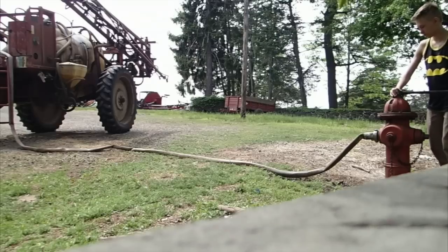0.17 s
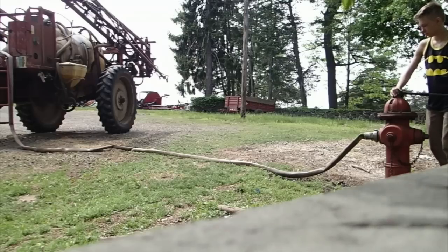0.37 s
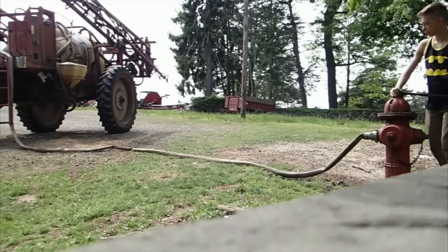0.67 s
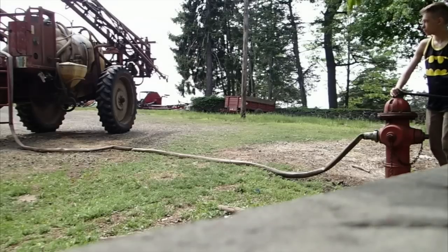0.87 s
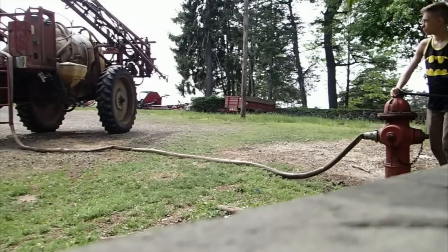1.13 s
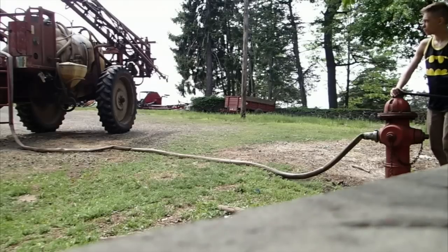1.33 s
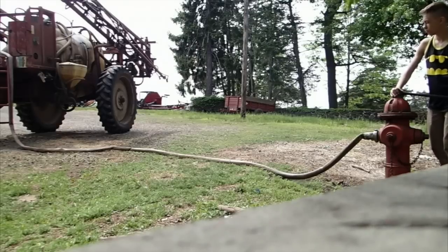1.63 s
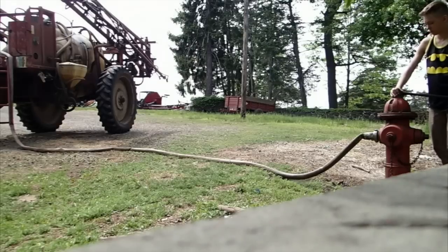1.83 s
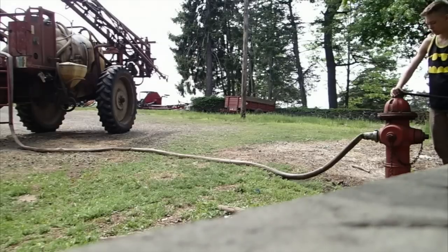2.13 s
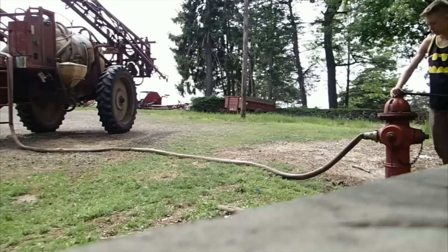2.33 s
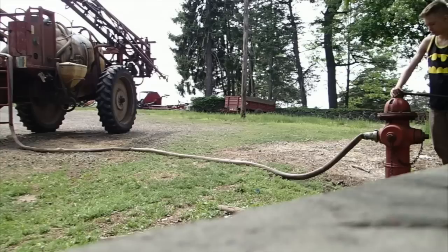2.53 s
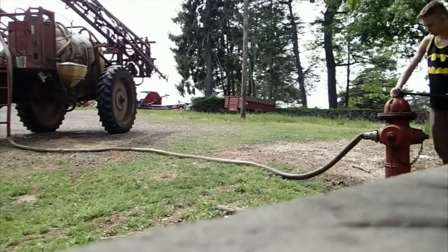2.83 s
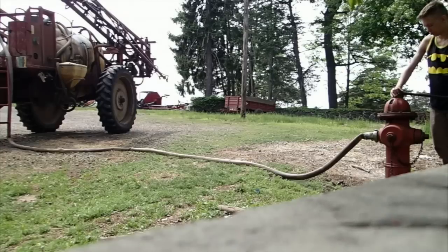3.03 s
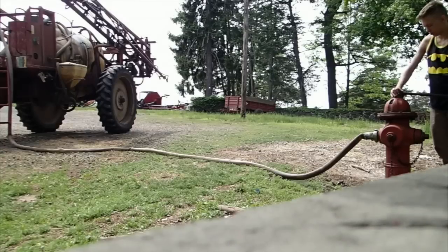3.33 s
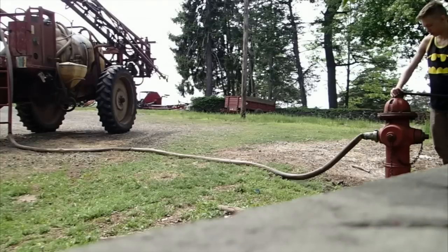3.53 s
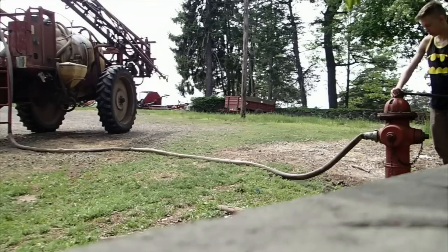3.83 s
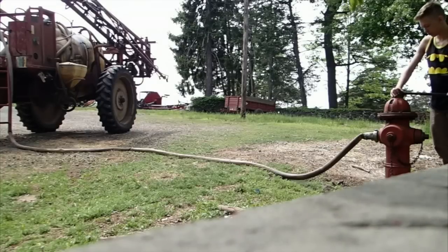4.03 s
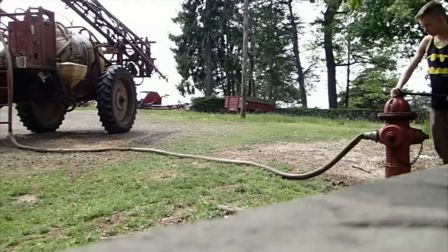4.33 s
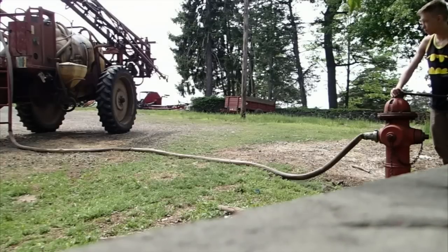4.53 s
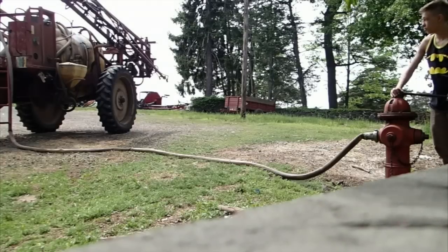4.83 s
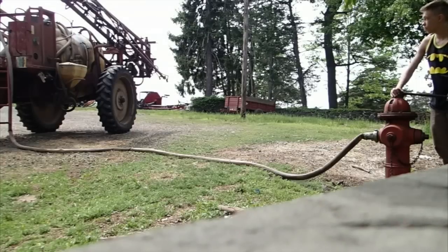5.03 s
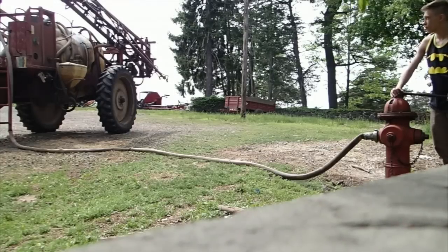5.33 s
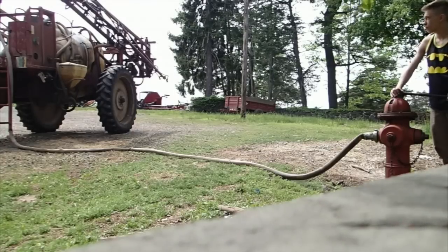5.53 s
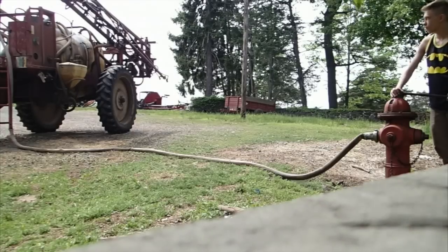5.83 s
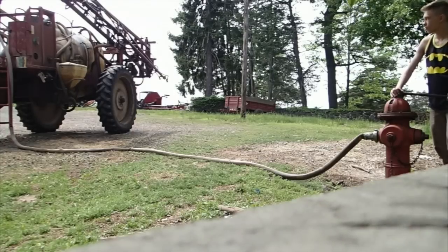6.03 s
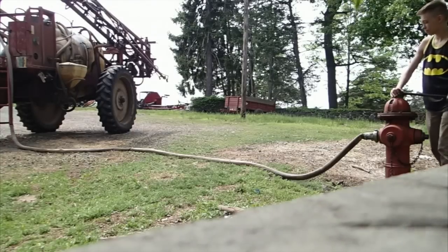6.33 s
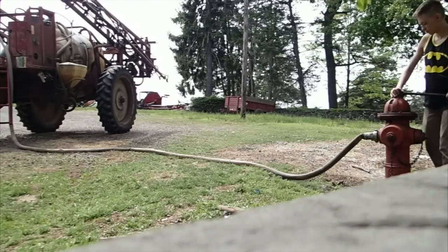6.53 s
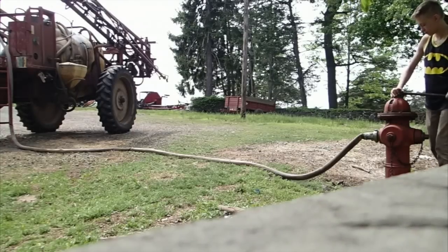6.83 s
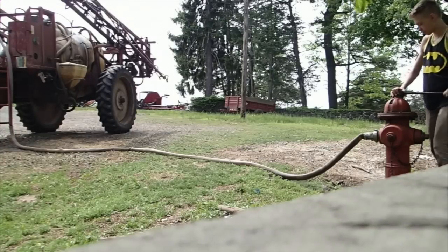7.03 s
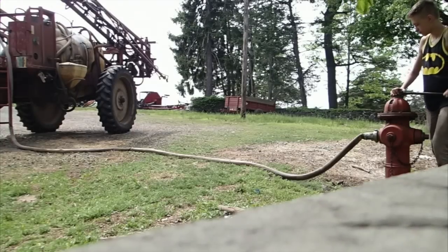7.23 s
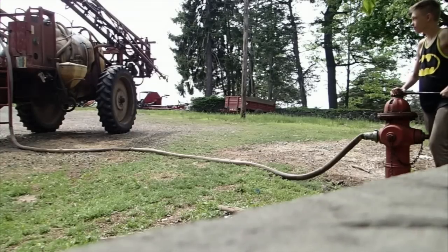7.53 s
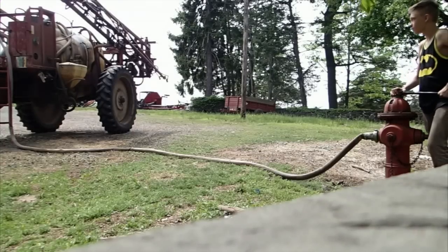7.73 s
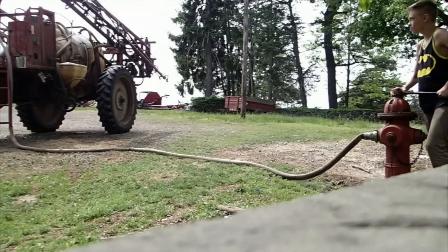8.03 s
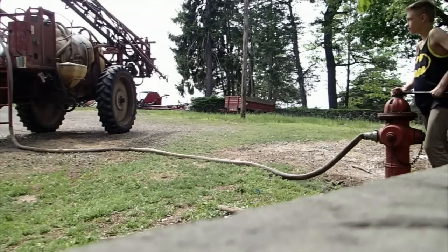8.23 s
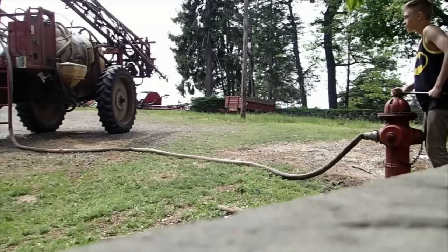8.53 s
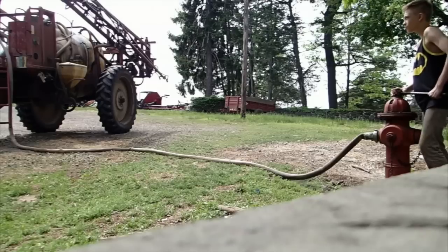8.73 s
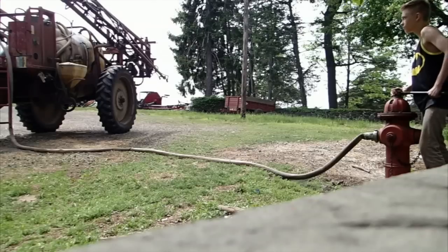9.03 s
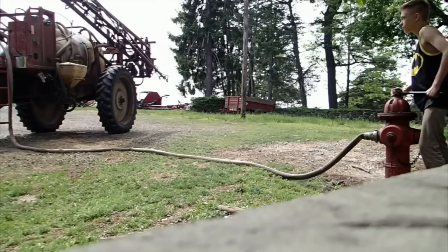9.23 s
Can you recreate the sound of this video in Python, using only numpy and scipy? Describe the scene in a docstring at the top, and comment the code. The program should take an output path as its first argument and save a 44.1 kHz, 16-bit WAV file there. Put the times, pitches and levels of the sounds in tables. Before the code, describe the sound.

A six-cylinder diesel engine on a farm sprayer idles without change for about 9.4 seconds, around 44 firings a second, blending into a rough, chattering purr with hard midrange knocks, metallic panel ringing, small ticks and a soft fan hum. One cylinder's ping repeats about seven times a second, clearest around 6.5 s. Water rushes steadily through a hose, a low whoosh with fine airy hiss that swells slightly near 4.7, 7.7 and 9 s. At 0.1 s a thin high squeak lasts a fifth of a second; at 2.8 s a cluster of tiny, scratchy chirps flickers by. From 0.8 s a faint wavering whistle swells and fades. Light breeze brushes the microphone, with soft low thumps near 0.8, 3.6, 5.5 and 6.6 s and a quick fluttering group at 8.3-8.5 s, when the level dips briefly. Open air, stereo, no reverberation.

```python
"""A six-cylinder diesel sprayer idles in a farmyard while water hisses through a hose into its tank.
From the start, firings ring the engine block, filtered noise makes hiss and breeze, and a thin tone squeaks.
From 0.8 s soft puffs of wind thump now and then, and a wavering tone, the housing's ring, swells and fades.
Near 2.8 s a cluster of tiny gliding tones squeaks again; near 8.4 s the loudest puffs come in a quick group.
The microphone housing also colours engine and water near 4.7 kHz; automatic gain turns loud moments down."""
import sys
import numpy as np
from scipy import signal
from scipy.fft import rfft, irfft
from scipy.io import wavfile
from scipy.ndimage import uniform_filter1d, map_coordinates

SR = 44100
rng = np.random.default_rng(int(sys.argv[2]) if len(sys.argv) > 2 else 0)


def store_pcm(level_fs):
    """Save levels as 16-bit WAV."""
    pcm = np.round(np.clip(level_fs, -1, 1) * 32767).astype(np.int16)
    wavfile.write(sys.argv[1], SR, np.atleast_2d(pcm).T)


N = 414099
TIME = np.arange(N) / SR
FREQ = np.maximum(np.fft.rfftfreq(N, 1 / SR), 1)

# idle speed, counted in firings per second: time_s, firing_rate_hz
IDLE_SPEED = [(0, 44.46), (1.2, 44.42), (2.2, 44.22), (3.2, 44.2), (4.6, 44.43), (5.6, 44.34),
              (9.39, 44.29)]
# cylinders in firing order, relative strengths: knock_db, clatter_db
CYLINDER_STRENGTHS = [(-7, .3), (-12, -.3), (-8, 0), (-9, -.6), (-11, .3), (-9, .6)]
# relative spectrum of the combustion knock: pitch_hz, level_db
KNOCK_SPECTRUM = [(30, -55), (100, -27), (500, -14.5), (1100, 0), (1500, -2), (2000, 0.5), (2550, 0),
                  (3000, -11), (4000, -24), (5000, -20), (7000, -28), (14000, -45)]
# relative spectrum of the gear and valve clatter: pitch_hz, level_db
CLATTER_SPECTRUM = [(25, -49), (40, -35), (75, -12.5), (120, -4.5), (165, 0), (245, 0), (380, -8.5),
                    (620, -4.5), (1100, -3), (1450, -4), (2500, -5.5), (3000, -8), (4000, -14.5),
                    (4500, -11), (5500, -10), (7500, -28.5), (14000, -51)]
# ringing panels of block and sump: pitch_hz, width_hz, height_db over the plain spectrum
BLOCK_PANELS = [(315, 22, 2), (398, 16, -1), (473, 16, 4), (553, 24, 5), (595, 30, -1), (792, 18, 3),
                (842, 18, 5), (885, 16, 2), (931, 12, 3), (1060, 20, -2), (1108, 30, 2), (1172, 24, -1),
                (1235, 20, -2), (1286, 14, 7), (1343, 18, 0), (1441, 18, 8), (1485, 18, -1), (1565, 24, -2),
                (1638, 18, 4), (1678, 20, 0), (1790, 20, -2), (1997, 26, 4), (2035, 20, -2), (2135, 40, -1),
                (2315, 50, -2), (2485, 40, -4), (2620, 80, -2), (3920, 60, 3)]
# narrow bands the block hardly radiates: pitch_hz, width_hz, strength_db
BLOCK_NOTCHES = [(415, 70, 6), (515, 30, 1), (655, 30, -2), (730, 40, -4), (1262, 16, 1), (1305, 14, 1),
                 (1395, 40, 7), (1835, 30, -1), (1950, 50, -2), (2075, 45, 4), (2200, 35, 0),
                 (2420, 70, -2), (2820, 180, -3), (4010, 100, 3)]
# exhaust and gear tones: multiple of the firing rate
TONE_MULTIPLES = [2, 2.5, 3, 4, 7, 12.5, 21, 29]
# levels of those tones: level_db
TONE_LEVELS = [-47, -51.5, -51, -46, -48, -49, -41, -42.5]
# blows of moving parts in every engine cycle: place_firings, half_length_s, start_hz, end_hz, relative_db
PART_BLOWS = [(.12, .0014, 2000, 2050, -18.5), (.13, .0012, 2650, 2600, -23), (.2, .0012, 1200, 1050, -19),
              (.49, .0016, 1200, 1650, -25), (.88, .0016, 1050, 1050, -26.5),
              (1.22, .0015, 1800, 1800, -28), (1.37, .0014, 950, 1200, -23.5),
              (2.12, .0018, 1600, 1620, -25), (2.42, .0016, 1100, 1500, -25.5),
              (3.31, .0016, 1150, 1000, -26), (3.35, .0015, 1800, 1750, -27), (3.9, .002, 1100, 1100, -29),
              (4.15, .0016, 2200, 1950, -27), (4.45, .0058, 830, 1300, -21.5),
              (4.88, .0016, 1100, 1100, -26), (5.18, .0016, 2400, 2450, -28),
              (5.28, .0018, 1250, 1330, -26.5)]
# slow rise and fall of the first cylinder's ring: time_s, change_db
PING_SWELL = [(0, -3), (1.4, 1), (3.6, -4), (4.4, -1), (5.7, -2), (6.5, 4.5), (6.9, 4), (7.5, 0),
              (9.39, -1)]
# relative spectrum of the water: pitch_hz, level_db
WATER_SPECTRUM = [(100, -3), (400, 24.5), (1200, 23.5), (3000, 17), (4000, 9.5), (5000, 15.5), (6300, 6),
                  (8000, 1.5), (10500, 0.5), (12300, 2.5), (14000, -8.5), (15500, -27)]
# swells of the fine spray: peak_s, half_length_s, rise_db
SPRAY_SWELLS = [(4.7, 0.91, 3.2), (7.7, .45, 2), (9.0, .25, 3)]
# swells of the narrow housing ring near 4.7 kHz: peak_s, half_length_s, rise_db
HOUSING_RING_SWELLS = [(.77, .04, 7.5), (.91, .08, 10), (1.2, .14, 9), (1.59, .11, 8.5), (1.86, .055, 9.5),
                       (2.15, .065, 10), (2.33, .04, 7), (2.46, .08, 9.5), (2.62, .04, 7), (3.23, .05, 10),
                       (3.35, .04, 8), (3.46, .04, 7), (4.33, .12, 6.5), (4.57, .1, 9), (4.9, .04, 7),
                       (5.13, .11, 8), (5.45, .14, 8), (6.19, .04, 6.5), (6.3, .055, 10), (6.83, .055, 9),
                       (6.98, .06, 7), (7.4, .11, 8.5), (7.72, .09, 8), (7.95, .07, 8.5), (9.1, .055, 8),
                       (9.28, .09, 9)]
# squeaks: start_s, length_s, start_hz, end_hz, level_db, roughness 0-1, share of the length spent rising
SQUEAK_GLIDES = [(.118, .218, 5020, 4805, -19, .06, .48), (2.755, .03, 5950, 5900, -31, .7, .3),
                 (2.797, .018, 6400, 5700, -27, .8, .3), (2.8, .034, 5300, 5400, -25, .7, .2),
                 (2.8, .012, 8800, 8200, -39, 1, .3), (2.806, .018, 7900, 7680, -32, .7, .3),
                 (2.803, .024, 11200, 10070, -40, .3, .6), (2.826, .03, 7750, 7750, -41, 1, .15),
                 (2.828, .02, 10100, 10080, -43, .3, .25), (2.888, .016, 6300, 5700, -32, .6, .4)]
# relative spectrum of the wind on the microphone ports: pitch_hz, level_db
WIND_SPECTRUM = [(20, -44), (45, -27), (70, -7.5), (110, 4.5), (170, 6.5), (320, -4), (500, -14.5),
                 (900, -30), (1500, -58)]
# gusts of the breeze: peak_s, half_length_s, relative_db
BREEZE_GUSTS = [(.07, .07, -39), (.22, .03, -40), (.59, .045, -38), (.93, .14, -40), (1.68, .1, -39),
                (2.3, .05, -45), (2.5, .045, -37), (3.42, .06, -39), (3.7, .15, -39), (4.07, .04, -38),
                (4.38, .2, -36.5), (4.98, .045, -39), (5.2, .1, -38), (5.5, .07, -36), (5.76, .14, -41),
                (6.38, .1, -38), (7.08, .2, -36.5), (7.58, .15, -42), (7.92, .05, -42), (8.25, .14, -41),
                (8.85, .11, -40), (9.3, .045, -33.5)]
# short puffs of wind: peak_s, half_length_s, centre_hz, level_db
WIND_PUFFS = [(.815, .028, 160, -28), (3.62, .022, 170, -26), (4.44, .03, 130, -35), (5.47, .025, 160, -29),
              (6.567, .02, 180, -22), (8.335, .008, 195, -19), (8.367, .016, 260, -20.5),
              (8.427, .007, 180, -18), (8.451, .01, 180, -17), (8.468, .014, 200, -21.5),
              (8.494, .009, 170, -19.5), (8.495, .007, 430, -20)]
# resonances of the microphone housing: pitch_hz, width_hz, height_db over the plain spectrum
HOUSING_MODES = [(4326, 155, 8.5), (4480, 150, 8), (4748, 110, 12), (4795, 300, 12.5), (4980, 130, 7.5),
                 (5270, 120, 9), (5407, 96, 10), (6280, 180, 2.5)]
# stereo spread of the engine: pitch_hz, side_db
ENGINE_SPREAD = [(100, -20), (260, -36), (600, -27), (1300, -48), (2300, -24.5), (3400, -17), (4700, -10.5),
                 (6000, -7.5), (9000, -3)]
# stereo spread of the water: pitch_hz, side_db
WATER_SPREAD = [(100, -25), (1200, -47), (3000, -20), (4700, -8), (7000, -3), (10000, -2.5), (13000, 0.5)]
# stereo spread of the wind: pitch_hz, side_db
WIND_SPREAD = [(30, 3), (150, -0.5), (380, 1), (700, -4)]
# how far the left port leads the right: pitch_hz, lead_radians
LEFT_LEAD = [(3450, 0), (4310, 0.92), (4650, -0.1), (5510, 0.81), (7410, .5), (9820, 0.2), (11600, 3),
             (13900, -1.5)]

START_PHASE = .48  # in firings
KNOCK_DB, CLATTER_DB = -35, -26  # average level between 600 and 3000 Hz
FAN_HZ, FAN_DB = 218.8, -36.3
PING_HZ, PING_DECAY_S, PING_DB = 2550, .008, -25.5  # middle pitch and level
SPRAY_DB, RUSH_DB = -45.5, -45.0  # gains on water noise scaled to unit level in 8-13 kHz
RING_HZ, RING_WAVER_HZ, RING_DB = 4746, 22, -35.6  # housing ring, level between swells
AGC_THRESHOLD_DB, AGC_SHARE = -19, 0.98  # share of the excess that is removed
AGC_WINDOW_S, AGC_RELEASE_S = 0.071, 0.084
TOP_HZ = 15200


def engine():
    """Knocks and clatter ring the block; moving parts, exhaust, gears and cooling fan add their sounds."""
    crank_wander = .006  # in firings
    phase = START_PHASE + np.cumsum(curve(IDLE_SPEED)) / SR
    block = resonances(BLOCK_PANELS) / resonances(BLOCK_NOTCHES)
    ring = block * resonances(HOUSING_MODES)
    knock, clatter = firings(phase)

    body = 0
    for force, spectrum, level_db in (
        (knock, KNOCK_SPECTRUM, KNOCK_DB),
        (clatter, CLATTER_SPECTRUM, CLATTER_DB),
    ):
        mid, side = filtered(force, colour(spectrum) * ring)
        scale = undb(level_db) / band_rms(mid, 600, 3000)
        body = body + stereo(mid, side, ENGINE_SPREAD) * scale

    crank = phase + crank_wander * walk(9)
    tones = np.zeros(N)
    for multiple, level_db in zip(TONE_MULTIPLES, TONE_LEVELS):
        turns = multiple * crank + rng.random()
        tones += undb(level_db + walk(5)) * np.sin(2 * np.pi * turns)
    fan_angle = 2 * np.pi * FAN_HZ * TIME + .5 * walk(5)
    fan = undb(FAN_DB + walk(6.5)) * np.sin(fan_angle)
    return body + filtered(blows(phase), block) + ping(phase) + np.sqrt(2) * (tones + fan)


def firings(phase):
    """Each firing pushes a sharp knock and a longer clatter; a cylinder partly repeats itself each time."""
    repeat, scatter_db, jitter_s = 0.64, 1.0, .00007
    knock_peak_s, clatter_rise_s, clatter_decay_s, churn_db = .0017, .0029, .011, -10.0
    firing = phase.astype(int)
    cylinder = firing % len(CYLINDER_STRENGTHS)
    chance = rng.standard_normal((firing[-1] + 1, 3))[firing].T
    age = np.maximum(phase % 1 / curve(IDLE_SPEED) + jitter_s * chance[0], 0)

    strength_db = np.array(CYLINDER_STRENGTHS)[cylinder].T + scatter_db * chance[1:]
    knock, clatter = undb(strength_db)
    knock = knock * age / knock_peak_s * np.exp(1 - age / knock_peak_s)
    clatter = 2 * clatter * (1 - np.exp(-age / clatter_rise_s)) * np.exp(-age / clatter_decay_s)
    clatter = np.hypot(clatter, undb(churn_db))  # a constant churn fills the gaps

    # the low ring largely repeats from cycle to cycle, the treble rattle is new each time
    share = repeat / (1 + (FREQ / 2400) ** 4)
    forces = []
    for force in (knock, clatter):
        patterns = rng.standard_normal((len(CYLINDER_STRENGTHS), 2048))
        own = patterns[cylinder, (age * SR).astype(int)]
        fresh_mid, fresh_side = rfft(force * rng.standard_normal((2, N)))
        mid = np.sqrt(share) * rfft(force * own) + np.sqrt(1 - share) * fresh_mid
        forces.append(irfft([mid, fresh_side], N))
    return forces


def blows(phase):
    """Moving parts give short rounded knocks and one throaty rising gulp, a little different every cycle."""
    gain_db, scatter_db, jitter_s, pitch_scatter = -.5, 1.2, .00015, .06
    cycle = (phase / len(CYLINDER_STRENGTHS)).astype(int)
    place, rate = phase % len(CYLINDER_STRENGTHS), curve(IDLE_SPEED)
    out = np.zeros(N)
    for at, length, start_hz, end_hz, level_db in PART_BLOWS:
        on = np.abs(place - at) < 3 * length * rate
        size, shift, detune = rng.standard_normal((cycle[-1] + 1, 3))[cycle[on]].T
        age = (place[on] - at) / rate[on] + jitter_s * shift
        # the pitch glides evenly through the blow
        turns = (start_hz + end_hz) / 2 * age + (end_hz - start_hz) * age ** 2 / length / 4
        tone = np.sin(2 * np.pi * turns * (1 + pitch_scatter * detune))
        loudness = undb(level_db + gain_db + scatter_db * size)
        out[on] += loudness * np.exp(-(age / length) ** 2) * tone
    return np.sqrt(2) * out


def ping(phase):
    """Once a cycle the first cylinder rings a panel, louder at some times than others."""
    delay_s, rise_s, scatter_db, scatter_hz = .0015, .0008, 1.3, 50
    cycle = (phase / len(CYLINDER_STRENGTHS)).astype(int)
    size, detune = rng.standard_normal((cycle[-1] + 1, 2))[cycle].T
    age = np.maximum(phase % len(CYLINDER_STRENGTHS) / curve(IDLE_SPEED) - delay_s, 0)
    envelope = (1 - np.exp(-age / rise_s)) * np.exp(-age / PING_DECAY_S)
    loudness = undb(PING_DB + curve(PING_SWELL) + scatter_db * size)
    tone = np.sin(2 * np.pi * (PING_HZ + scatter_hz * detune) * age)
    return loudness * envelope * np.sqrt(2) * tone


def water():
    """Fluttering noise splits into a low rush inside the hose and a fine spray that swells with the flow."""
    flutter_db, surge_db, split_hz = 1.0, 1.0, 6500
    flutter = undb(flutter_db * walk(400) + surge_db * walk(14))
    noise = flutter * rng.standard_normal((2, N))
    mid, side = filtered(noise, colour(WATER_SPECTRUM) * resonances(HOUSING_MODES))
    jet = stereo(mid, side, WATER_SPREAD) / band_rms(mid, 8000, 13000)
    rush = irfft(rfft(jet) / (1 + (FREQ / split_hz) ** 8), N)
    spray = jet - rush
    return rush * undb(RUSH_DB) + spray * undb(flow())


def flow():
    """Level of the spray in dB: steady, with a slight wander and a few smooth swells."""
    wander_db = .5
    return SPRAY_DB + bumps(SPRAY_SWELLS) + wander_db * walk(4)


def housing_ring():
    """Narrow housing ring near 4.7 kHz, excited by the hiss: a wavering sine that swells and fades."""
    flutter_db = 1.9
    hz = RING_HZ + RING_WAVER_HZ * walk(45)
    loudness = undb(RING_DB + bumps(HOUSING_RING_SWELLS) + flutter_db * walk(22))
    return loudness * np.sqrt(2) * np.sin(2 * np.pi * np.cumsum(hz) / SR)


def squeaks():
    """Thin tones glide quickly to a settled pitch; the rough ones waver and flutter."""
    settle, waver_hz, flutter_db = 7, 170, 3.5  # settle: glide speed per squeak length
    out = np.zeros(N)
    waver, flutter = waver_hz * walk(900), flutter_db * walk(400)
    for start, length, start_hz, end_hz, level_db, rough, rise in SQUEAK_GLIDES:
        on = (TIME > start) & (TIME < start + length)
        along = (TIME[on] - start) / length
        hz = end_hz + (start_hz - end_hz) * np.exp(-settle * along) + rough * waver[on]
        envelope = np.sqrt(np.sin(np.pi * np.interp(along, [0, rise, 1], [0, .5, 1])))
        loudness = undb(level_db + rough * flutter[on])
        out[on] += loudness * np.sqrt(2) * envelope * np.sin(2 * np.pi * np.cumsum(hz) / SR)
    return out


def wind():
    """Gusts rumble on the ports; each puff sheds a broad band of eddies, higher when it is faster."""
    lull_db, gust_wander_db, eddy_hz = -55.0, 1.5, 150
    breeze = filtered(rng.standard_normal((2, N)), colour(WIND_SPECTRUM))
    gusts = [(peak, length, undb(level_db)) for peak, length, level_db in BREEZE_GUSTS]
    strength = undb(lull_db) + bumps(gusts)
    air = breeze / np.std(breeze) * strength * undb(gust_wander_db * walk(16))

    # even out the rumble's loudness, then play it faster or slower for each puff
    eddies = breeze / np.sqrt(uniform_filter1d(breeze ** 2, size=700))
    for peak, length, hz, level_db in WIND_PUFFS:
        on = np.flatnonzero(np.abs(TIME - peak) < 3 * length)
        read_at = on * hz / eddy_hz % (N - 1)
        puff = np.array([map_coordinates(port, [read_at], order=1) for port in eddies])
        air[:, on] += undb(level_db) * np.exp(-((TIME[on] - peak) / length) ** 2) * puff
    return stereo(*air, WIND_SPREAD)


def undb(db):
    """Decibels to gain."""
    return 10 ** (np.asarray(db) / 20)


def curve(rows):
    """Straight lines between (time, value) rows, at every sample."""
    return np.interp(TIME, *np.transpose(rows))


def bumps(rows):
    """Sum of smooth swells from (peak_s, half_length_s, height) rows, at every sample."""
    coarse = TIME[::100]
    swells = sum(height * np.exp(-((coarse - peak) / length) ** 2) for peak, length, height in rows)
    return np.interp(TIME, coarse, swells)


def walk(rate):
    """Smooth random wander with a spread near 1, heading for a new value `rate` times a second."""
    knots = rng.standard_normal(8192)
    return 1.2 * np.interp(TIME * rate, np.arange(len(knots)), knots)


def colour(points):
    """Gain at every frequency from (pitch_hz, level_db) points."""
    hz, db = np.transpose(points)
    return undb(np.interp(np.log(FREQ), np.log(hz), db))


def resonances(modes):
    """Gain of resonances that stand out of a flat response; their powers add."""
    power = 1
    for hz, width, db in modes:
        power = power + undb(db) ** 2 / (1 + (2 * (FREQ - hz) / width) ** 2) ** 1.37
    return np.sqrt(power)


def filtered(x, gain):
    """Filter of the given gain that acts only forward in time, so resonances ring after each blow."""
    cepstrum = irfft(np.log(gain), N)  # folding it gives the matching minimum phase
    cepstrum[1:N // 2] *= 2
    cepstrum[N // 2 + 1:] = 0
    return irfft(rfft(x) * np.exp(rfft(cepstrum)), N)


def band_rms(x, low_hz, high_hz):
    """Average (rms) level of one band."""
    band = rfft(x)[(FREQ > low_hz) & (FREQ < high_hz)]
    return np.sqrt(2 * np.sum(np.abs(band) ** 2)) / N


def stereo(mid, side, spread):
    """Left and right from a shared middle and a side signal weighted by frequency."""
    side = irfft(rfft(side) * colour(spread), N)
    return np.array([mid + side, mid - side])


def scene():
    """Engine, water, the housing's ring, squeaks and breeze in the open air."""
    return engine() + water() + housing_ring() + squeaks() + wind()


def gain_control(x):
    """Turns both channels down while their average level is above a threshold, then recovers."""
    power = uniform_filter1d(np.mean(x ** 2, axis=0), size=int(AGC_WINDOW_S * SR))
    excess_db = np.maximum(10 * np.log10(power + 1e-12) - AGC_THRESHOLD_DB, 0)
    keep = np.exp(-1 / (AGC_RELEASE_S * SR))
    smooth_excess_db = signal.lfilter([1 - keep], [1, -keep], excess_db)
    return x * undb(-AGC_SHARE * smooth_excess_db)


def record(dry):
    """The left port's treble is shifted in phase and a bit softer; gain rides the level; the top is cut."""
    lead = np.exp(1j * np.interp(FREQ, *np.transpose(LEFT_LEAD)))
    left = lead * colour([(2500, 0), (4500, -0.3)])
    ports = np.array([irfft(rfft(dry[0]) * left, N), dry[1]])
    top_cut = signal.ellip(8, .2, 70, TOP_HZ, fs=SR, output="sos")
    return signal.sosfilt(top_cut, gain_control(ports))


dry = scene()
out = record(dry)
store_pcm(out)
```